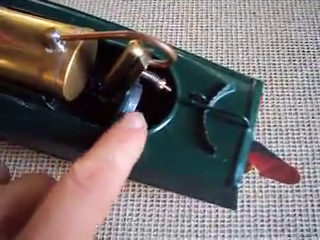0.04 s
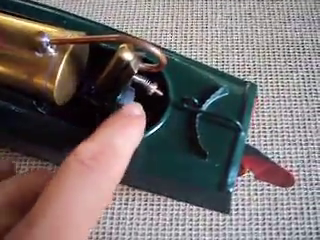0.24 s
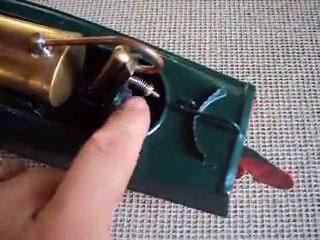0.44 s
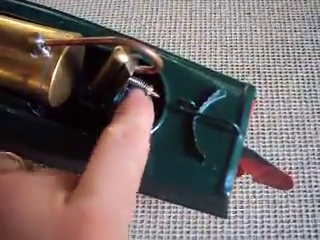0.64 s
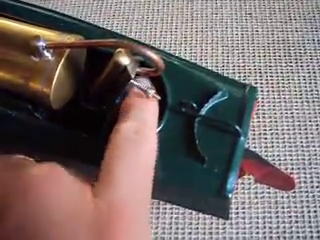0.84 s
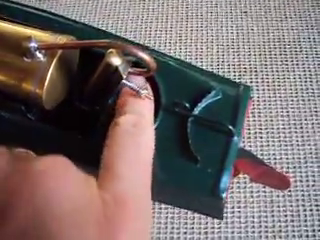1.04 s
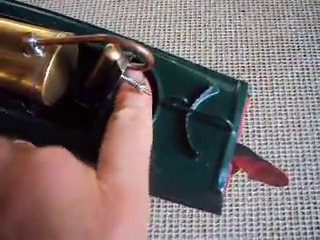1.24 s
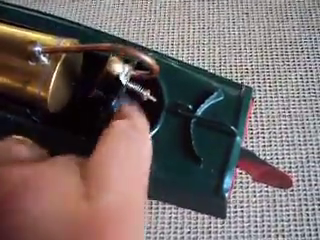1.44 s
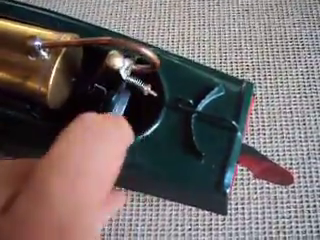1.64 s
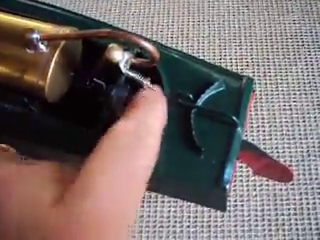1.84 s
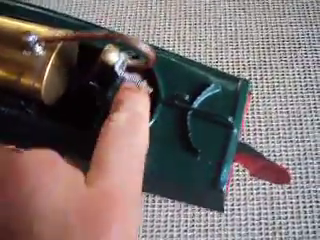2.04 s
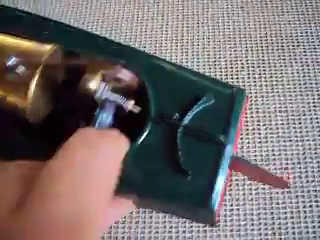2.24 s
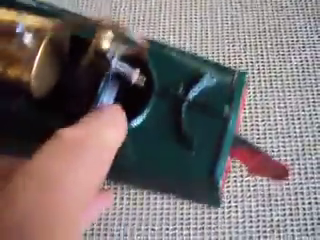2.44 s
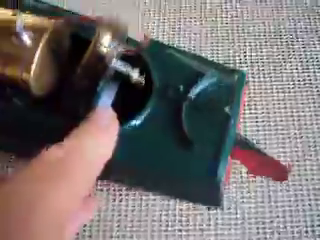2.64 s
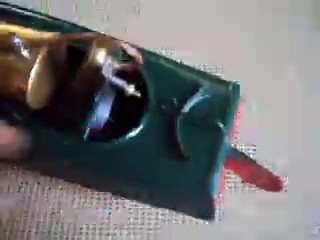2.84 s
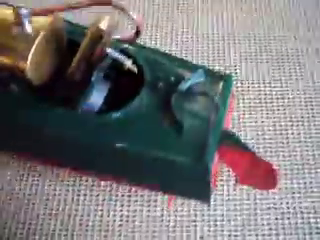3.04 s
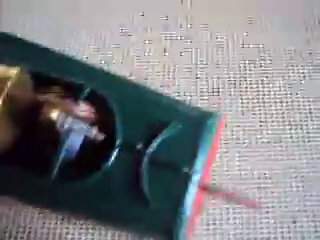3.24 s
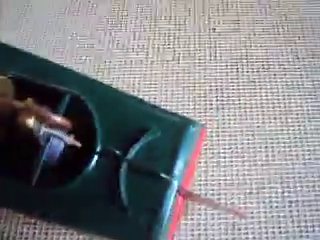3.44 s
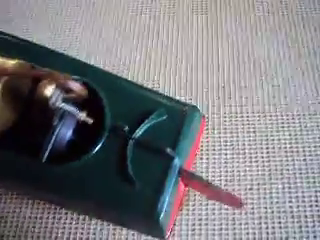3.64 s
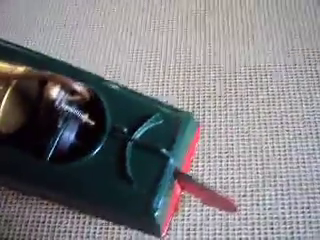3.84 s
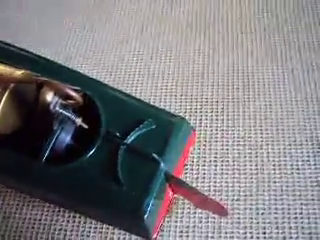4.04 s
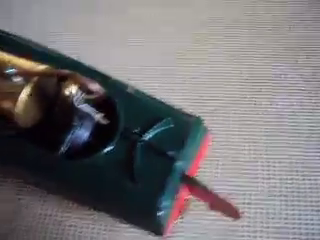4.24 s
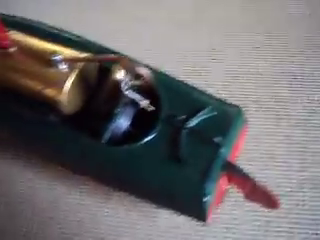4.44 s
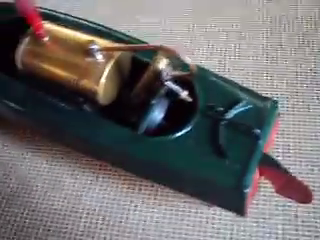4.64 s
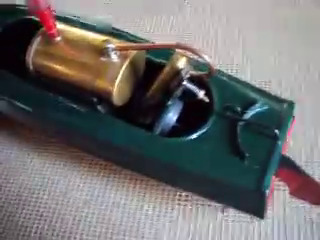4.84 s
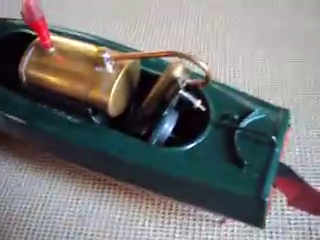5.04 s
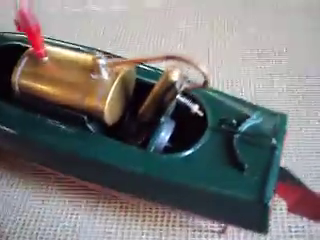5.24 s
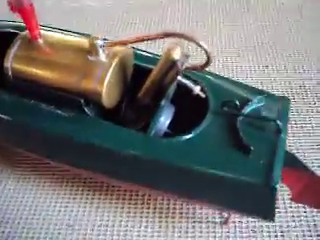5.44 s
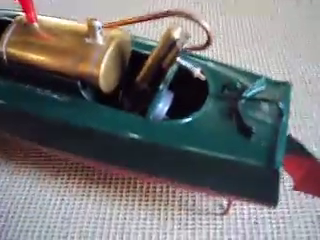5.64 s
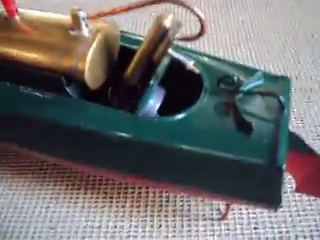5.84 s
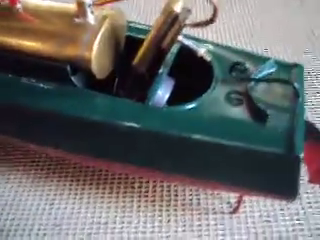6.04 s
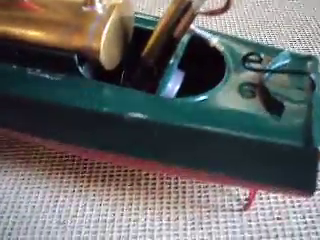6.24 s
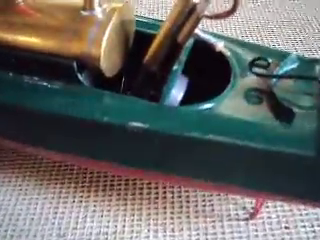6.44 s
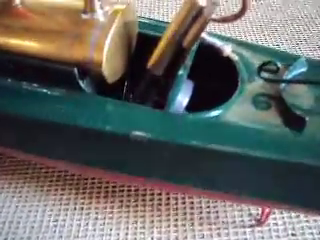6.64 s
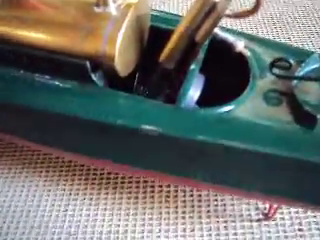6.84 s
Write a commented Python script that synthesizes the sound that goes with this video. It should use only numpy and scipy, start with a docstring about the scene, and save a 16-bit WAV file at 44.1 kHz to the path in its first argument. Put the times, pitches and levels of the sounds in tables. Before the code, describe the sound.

A small air pump throbs softly indoors, then a toy engine abruptly bursts into a loud, fast, tinny clatter with hissing air, overloading the microphone.

```python
"""A tin toy boat with an oscillating-cylinder engine is fed by a small air pump in a carpeted room.
First the pump throbs alone, as summed stroke tones and valve ticks, over room noise and a faint leak.
From 2.33 s the engine runs at about 41 turns a second: piston knocks ring the tin hull through resonators,
the ports puff shaped noise, the shaft shakes as tones, and the pump goes on, running easier.
The small microphone close by overloads throughout the loud parts."""
import sys
import numpy as np
from scipy import signal
from scipy.fft import rfft, irfft
from scipy.io import wavfile
from scipy.ndimage import uniform_filter1d

SR = 44100
rng = np.random.default_rng(int(sys.argv[2]) if len(sys.argv) > 2 else 0)


def pcm_store(signal):
    """Save signal as 16-bit PCM."""
    levels = np.round(np.clip(np.atleast_2d(signal), -1, 1) * 32767)
    wavfile.write(sys.argv[1], SR, levels.astype(np.int16).T)


N = 304731

# Room noise spectrum: (frequency [Hz], relative density [dB per Hz])
ROOM_SPECTRUM = [(15, -32), (25, -15.5), (49, -20), (159, -17.5), (215, -29.5), (426, -4.5), (489, -16.5),
                 (705, -14.5), (928, -19.5), (1370, -30), (2480, -31), (4710, -32.5), (5920, -39),
                 (7700, -90.5), (13000, -120)]
# Room and leak: (time [s], room level [dB], leak level [dB])
ROOM_LEVELS = [(0, -41.5, -55.5), (1.4, -42, -53.5), (1.6, -37, -49), (2.2, -38, -49), (2.3, -36.5, -55)]

# Pump case resonances excited by each stroke: (frequency [Hz], width [Hz], level [dB])
PUMP_MODES = [(81.5, 110, -53.5), (154.4, 37, -42), (265.7, 34, -46.5), (340.6, 48, -40.5),
              (363.3, 17.3, -38), (397.8, 18.5, -38), (430.6, 4.7, -26.5), (514, 40, -48), (563, 19, -40),
              (629.3, 15, -46.5), (666, 34, -46.5), (717, 14.4, -29), (838, 69, -54.5)]
# Where the motor beats against the strokes:
# (frequency [Hz], width [Hz], tones above the multiples [dB], tones below [dB])
BEAT_MODES = [(410, 58, -48, -47), (580, 69, -59.5, -58), (635.4, 33, -56, -37.5), (748, 34, -60, -51.5)]
# Pump valve resonances: (frequency [Hz], width [Hz], relative level [dB])
VALVE_MODES = [(1040, 60, -1.5), (1375, 37, 1), (1622, 92, -2.5)]
# Pump while the engine draws air: (multiple of the stroke rate [1])
EASED_MULTIPLES = [5, 6, 7, 15, 16, 17, 17.66, 18, 19]
# Their levels before the swell: (level [dB])
EASED_LEVELS = [-56.5, -52.5, -62, -45, -41.5, -36, -51, -30.5, -48]
# Swell of the eased pump: (time [s], gain [dB])
EASED_SWELL = [(2.33, -27.5), (2.95, -2), (6.91, 1)]
PUMP_HZ, EASED_HZ, BEAT_HZ, FIRST_STROKE_S = 22.802, 22.99, 14.1, 0.019
BETWEEN_DB, BEATS_BETWEEN_DB, VALVE_DB = -82.5, -78, -48
LAG_S_PER_KHZ = .0052  # higher tones of a stroke come later

# Rumble spectrum: (frequency [Hz], relative density [dB per Hz])
RUMBLE_SPECTRUM = [(25, -18.5), (60, -4), (150, 2.5), (300, 4.5), (450, 6), (700, -22.5)]
# Rumble carried by the hand and carpet: (time [s], level [dB])
RUMBLE_LEVELS = [(2.33, -28), (2.37, -24), (2.45, -35), (4.5, -41.5), (5.5, -40.5), (6.91, -30)]
# Turning of the boat: (time [s], share turned [1])
TURNING = [(5.4, 0), (5.9, 1)]
# Flywheel: (time [s], speed [turns/s])
FLYWHEEL_SPEED = [(2.3, 41.266), (2.6, 41.505), (3.2, 40.59), (5.6, 40.821), (5.95, 41.073), (6.95, 41.099)]
# Shaft shake, multiples of the speed from 1 up, before the swell: (level [dB])
SHAFT_LEVELS = [-54.5, -52, -43.5, -45.5, -45, -54.5, -45.5, -48.5, -54, -51, -58.5, -44, -41, -36.5, -31,
                -39, -37.5, -44, -39, -48, -36, -39, -39.5]
# Shaft shake once the boat has turned: (frequency [Hz], change [dB])
TURNED_SHAFT = [(400, 5), (680, 3), (740, 14), (800, 1.5), (950, 5)]
# Air through the ports and leak: (frequency [Hz], relative density [dB per Hz])
AIR_SPECTRUM = [(1000, -36.5), (1700, -7), (1940, -4), (2300, -3), (2640, -8.5), (3080, -4.5), (3510, -12),
                (4350, -15.5), (5360, -27.5), (5920, -22.5), (7700, -58.5), (13000, -120)]
# Port whistles: (frequency [Hz], width [Hz], relative level [dB], change as the boat turns [dB])
WHISTLE_MODES = [(2334, 68, 2, -4), (2640, 48, -9.5, 14), (3024, 160, -10, 10.5), (3305, 29, -12.5, 11)]
# Thin ring in the air: (frequency [Hz], width [Hz], relative level [dB])
THIN_RING_MODES = [(4203, 87, 0)]
# Thin ring: (time [s], level re air [dB])
THIN_RING_LEVELS = [(2.33, -27), (4.1, -27.5), (4.6, -16), (5.6, -17.5), (6, -25), (6.91, -17)]
# Engine: (time [s], hull level before mixing [dB])
HULL_LEVELS = [(2.33, -15.5), (2.39, -14.5), (2.44, -15.5), (2.66, -13), (2.7, -16.5), (2.84, -14),
               (3.26, -11), (3.27, -17.5), (3.39, -13), (3.82, -17), (4.03, -11), (4.27, -16), (4.41, -9),
               (4.43, -17), (4.52, -16), (5.3, -13), (5.35, -15.5), (6.05, -16.5)]
# Deep hull: (time [s], level re hull [dB])
DEEP_LEVELS = [(2.33, -9.5), (2.9, -12.5), (3.4, -9.5), (6.91, -6.5)]
# Deep modes of the tin hull:
# (frequency [Hz], width [Hz], relative level [dB], change as the boat turns [dB])
DEEP_MODES = [(537, 82, -7, 0.5), (616, 41, 1.5, 2.5), (677.5, 50, 0.5, 2.5), (757.5, 74, -2, 5)]
# Higher modes of the tin hull: columns as DEEP_MODES
HULL_MODES = [(903, 84, -3.5, -2.5), (944.2, 52.5, 3, -2), (1001, 55, -1, 4.5), (1076.3, 44, -1.5, 4),
              (1164, 52, -12, 5.5), (1336, 53, -7, 4), (1572, 74, -11.5, 2.5)]
# Knocks in each turn: (place [turns], strength before chance [dB], rattle length [turns],
# deep share [dB], pitch [Hz], change as the boat turns [dB])
KNOCKS = [(.08, -2.5, 0.037, -6, 937, 4.5), (.22, -1.5, 0.05, 3, 911, 1), (.38, -1, 0.045, -10, 1034, -2),
          (.69, -2.5, .035, -12, 979, 0.5), (.83, -15, 0.081, 7, 840, 2)]
# Hardest blows: (time [s], strength before mixing [dB])
HARD_BLOWS = [(2.332, -8), (2.364, 3.5), (2.39, -6), (2.396, 4), (2.516, -0.5), (2.62, -3.5), (2.636, 0),
              (2.657, -0.5), (2.761, -0.5), (2.811, -1.5), (2.932, -7.5), (2.955, 1), (2.982, -1.5),
              (3.204, -5), (3.229, -0.5), (3.249, 1), (3.332, -2), (3.403, 0), (3.987, -2.5), (4.029, -2),
              (4.067, 4), (4.116, -3.5), (4.29, -1), (4.339, -1.5), (4.531, -3), (5.121, -3.5),
              (5.194, -1.5), (5.287, 2), (5.734, -4.5), (5.782, 0), (5.874, -4), (5.999, -7.5),
              (6.072, -3.5), (6.166, 0.5), (6.24, -5), (6.312, -6.5), (6.366, -0.5), (6.411, -6),
              (6.582, -3), (6.608, -5.5), (6.735, -2.5), (6.801, -3.5), (6.85, 1.5)]
START_S, AIR_BUILDS_S, FIRST_TURN_TURNS = 2.329, 0.02, .141
USUAL_HULL_DB, AIR_DB = -14.5, -26.5
AIR_FOLLOWS = .8  # dB of air per dB of slow engine level

FIRST_CEILING, SECOND_CEILING, EDGE_HZ = 0.7, 0.735, 15800  # microphone


def amp(db):
    """Decibels to gain."""
    return 10 ** (np.asarray(db) / 20)


def evened(x):
    """Scales to rms 1."""
    return x / np.sqrt(np.mean(x ** 2) + 1e-20)


def curves(rows):
    """Each column of a table, interpolated sample by sample."""
    times_s, *columns = np.transpose(rows)
    return [np.interp(np.arange(N) / SR, times_s, column) for column in columns]


def coloured(points):
    """Noise with the given spectrum, rms 1."""
    point_hz, point_db = np.transpose(points)
    hz = np.fft.rfftfreq(N, 1 / SR)
    gain_db = np.interp(np.log(hz + 1), np.log(point_hz + 1), point_db, left=-90, right=-90)
    return evened(irfft(rfft(rng.standard_normal(N)) * amp(gain_db), N))


def ring(x, modes):
    """Sum of two-pole resonances, gain 1 at centre before their levels, neighbours of opposite sign."""
    turning = curves(TURNING)[0][:len(x)]
    total = 0
    for k, (hz, width_hz, db, *change_db) in enumerate(modes):
        gain = amp(db + sum(change_db) * turning)  # the fourth column is optional
        total = total + (-1) ** k * gain * signal.lfilter(*signal.iirpeak(hz, hz / width_hz, SR), x)
    return total


def sounding(hz, modes, between_db):
    """Level in dB of tones at hz, lifted near each resonance."""
    power = amp(between_db) ** 2
    for mode_hz, width_hz, db in modes:
        power = power + amp(db) ** 2 / (1 + (2 * (hz - mode_hz) / width_hz) ** 2) ** 2
    return 10 * np.log10(power)


def stroke(multiples, db, turns, shift_turns=0, lag=0):
    """Tones of a repeated blow: minimum phase makes each stroke start hard and ring out."""
    log_gain = np.log(amp(np.interp(np.arange(65), multiples, db, right=-80)))
    phase = -signal.hilbert(np.r_[log_gain, log_gain[-2:0:-1]]).imag
    phase = np.interp(multiples, np.arange(128), phase) - np.pi * lag * np.square(multiples)
    return sum(np.sqrt(2) * amp(tone_db) * np.cos(2 * np.pi * (k * turns + shift_turns) + tone_phase)
               for k, tone_db, tone_phase in zip(multiples, db, phase))


def running():
    """Engine gate: 0 before the start, 1 after a short ramp."""
    return np.clip((np.arange(N) / SR - START_S) / 0.0029, 0, 1)


def room():
    """Steady noise of the room and hiss of the leak at the engine, each shaped by its spectrum."""
    room_db, leak_db = curves(ROOM_LEVELS)
    return amp(room_db) * coloured(ROOM_SPECTRUM) + amp(leak_db) * coloured(AIR_SPECTRUM)


def valve_ticks(turns, beat):
    """Valves tick twice a stroke, hardest where motor and stroke fall together."""
    ticks_db = 3.2 * np.cos(4 * np.pi * (turns - .1))
    ticks_db += 2.4 * np.cos(2 * np.pi * (turns - .15))
    ticks_db += 3.0 * np.cos(2 * np.pi * (beat - .05))
    noise = rng.standard_normal(len(turns))
    return amp(VALVE_DB) * evened(ring(amp(ticks_db) * noise, VALVE_MODES))


def pump():
    """Strokes ring the case, the motor beats against them; eased once the engine draws air."""
    t_s, cut = np.arange(N) / SR, round(START_S * SR) + 200
    k = np.arange(1, 40)
    above_modes = [(hz, width_hz, above_db) for hz, width_hz, above_db, below_db in BEAT_MODES]
    below_modes = [(hz, width_hz, below_db) for hz, width_hz, above_db, below_db in BEAT_MODES]
    stroke_db = sounding(k * PUMP_HZ, PUMP_MODES, BETWEEN_DB)
    above_db = sounding(k * PUMP_HZ + BEAT_HZ, above_modes, BEATS_BETWEEN_DB)
    below_db = sounding(k * PUMP_HZ - BEAT_HZ, below_modes, BEATS_BETWEEN_DB)
    turns, beat = (t_s[:cut] - FIRST_STROKE_S) * PUMP_HZ, t_s[:cut] * BEAT_HZ
    lag = LAG_S_PER_KHZ / 1000 * PUMP_HZ ** 2
    loaded = -stroke(k, stroke_db, turns, lag=lag)  # the case is pulled in first
    loaded -= stroke(k, above_db, turns, beat + 0.42, lag)
    loaded -= stroke(k, below_db, turns, .6 - beat, lag)
    loaded += valve_ticks(turns, beat)
    eased = amp(*curves(EASED_SWELL)) * stroke(EASED_MULTIPLES, EASED_LEVELS, t_s * EASED_HZ)
    return np.pad(loaded, (0, N - cut)) * (1 - running()) + eased * running()


def rumble():
    """Low noise carried by the hand and carpet."""
    return amp(*curves(RUMBLE_LEVELS)) * coloured(RUMBLE_SPECTRUM)


def shaft(turns, swell_db):
    """Shake at multiples of the shaft speed; swells with the engine, its balance shifts as the boat turns."""
    k, turning = 1 + np.arange(len(SHAFT_LEVELS)), curves(TURNING)[0]
    turned_db = SHAFT_LEVELS + np.interp(k * FLYWHEEL_SPEED[-1][1], *np.transpose(TURNED_SHAFT))
    before = (1 - turning) * stroke(k, SHAFT_LEVELS, turns - .2)
    after = turning * stroke(k, turned_db, turns - .2)
    return amp(1.6 * swell_db) * (before + after)


def ports(turns, rattle):
    """The port opens fast and the pressure then falls; the jet hisses and whistles."""
    opening = (turns + 0.12) % 1
    chance_db = 2.5 * rng.standard_normal(int(turns[-1]) + 2)[(turns + .12).astype(int)]
    puff = amp(-7 * np.clip((opening - .42) / 0.38, 0, 1) ** 2.9 + chance_db)
    puff = uniform_filter1d(puff, size=60) + rattle
    whistles = ring(puff * rng.standard_normal(N), WHISTLE_MODES)  # the brass rings on after each puff
    thin = ring(ring(puff * rng.standard_normal(N), THIN_RING_MODES), THIN_RING_MODES)
    thin = amp(*curves(THIN_RING_LEVELS)) * evened(thin)
    hiss = evened(puff * coloured(AIR_SPECTRUM))
    return evened(hiss + 0.66 * evened(whistles)) + thin


def flexed(starts, hz, rise_s):
    """A blow flexes the tin for a few cycles; gives that shake and its outline."""
    t_s = np.arange(600) / SR
    outline = (t_s / rise_s * np.exp(1 - t_s / rise_s)) ** 2
    shake = outline * np.sin(2 * np.pi * hz * t_s)
    return signal.oaconvolve(starts[None], [shake, outline], axes=1)[:, :N]


def knocking(turns, free):
    """Same knocks each turn, of chance timing and strength: tin shake, rattle and deep-hull rattle."""
    turn_index = turns.astype(int) - int(turns[0])
    chance = np.clip(rng.standard_normal((turn_index[-1] + 1, 2 * len(KNOCKS))), -2, 2)
    shake, rattle, deep_rattle = np.zeros(N), np.full(N, .13), np.full(N, .15)
    turning, = curves(TURNING)
    for k, (place, db, length, deep_db, hz, change_db) in enumerate(KNOCKS):
        late = turns % 1 - place - .025 * chance[turn_index, 2 * k]
        size = amp(db + change_db * turning + 1.92 * chance[turn_index, 2 * k + 1]) * free
        knock = size * np.exp(-.5 * (late / length) ** 2)
        strikes = np.diff(np.sign(late), prepend=0) > 1  # the moment its place is passed
        shake += flexed(size * strikes, hz, 0.0016)[0]
        rattle += knock
        deep_rattle += amp(deep_db) * knock
    return shake, rattle, deep_rattle


def hull(shake, rattle, deep_rattle, blows):
    """Tin rung by knocks, rattle noise and the hardest blows."""
    hull_db, deep_db = curves(HULL_LEVELS) + curves(DEEP_LEVELS)
    noise = rng.standard_normal((2, N))
    knocks = evened(shake + amp(0.5) * ring(shake, HULL_MODES))
    rattling = evened(ring(rattle * noise[0], HULL_MODES))
    deep = evened(ring(deep_rattle * noise[1], DEEP_MODES))
    tin = amp(hull_db) * (amp(-4.0) * rattling + amp(-3.0) * knocks)
    tin += amp(-2.0) * blows + amp(-7.0) * ring(blows, HULL_MODES)
    return tin + amp(hull_db + deep_db) * deep


def engine():
    """The flywheel angle times the knocks on the hull, port puffs and shaft shake; rumble lies below."""
    turns = FIRST_TURN_TURNS + np.cumsum(*curves(FLYWHEEL_SPEED)) / SR
    swell_db = uniform_filter1d(curves(HULL_LEVELS)[0], size=9000) - USUAL_HULL_DB
    starts = np.zeros(N)
    starts[[round(time_s * SR) for time_s, db in HARD_BLOWS]] = [amp(db) for time_s, db in HARD_BLOWS]
    blows, blow_outline = flexed(starts, 939.5, 0.0024)
    near_blow = np.clip(uniform_filter1d(1. * (starts > 0), size=600) * 600, 0, 1)
    shake, rattle, deep_rattle = knocking(turns, 1 - 0.14 * near_blow)  # knocks weaken near a hard blow
    building = np.clip((np.arange(N) / SR - START_S) / AIR_BUILDS_S, 0, 1)
    air_gain = building * amp(AIR_DB + AIR_FOLLOWS * swell_db)
    air = air_gain * ports(turns, 0.62 * rattle + 1.13 * blow_outline)
    tin = hull(shake, rattle, deep_rattle, blows)
    return running() * (rumble() + shaft(turns, swell_db) + air + tin)


def scene():
    """All sources summed at one microphone."""
    return (room() + pump() + engine())[None]


def record(dry):
    """The microphone overloads and is dulled; overshoots meet a second ceiling; then a band limit."""
    dulling = signal.cheby2(14, 65, 6400, fs=SR, output="sos")
    dull = signal.sosfilt(dulling, np.clip(dry, -FIRST_CEILING, FIRST_CEILING))
    clipped = np.clip(dull + 0.0092, -SECOND_CEILING, SECOND_CEILING)  # small constant offset
    band_limit = signal.firwin(511, EDGE_HZ, window=("kaiser", 9), fs=SR)
    return signal.oaconvolve(clipped, band_limit[None], "same")


dry = scene()
out = record(dry)
pcm_store(out)
```